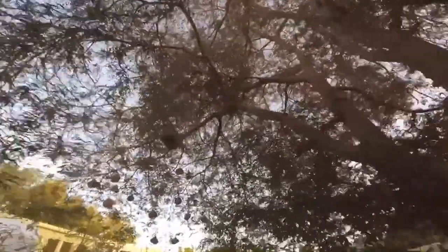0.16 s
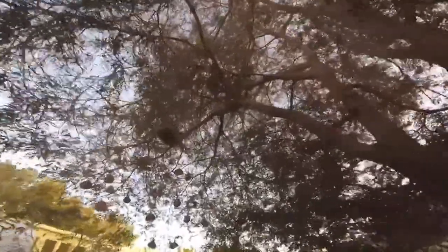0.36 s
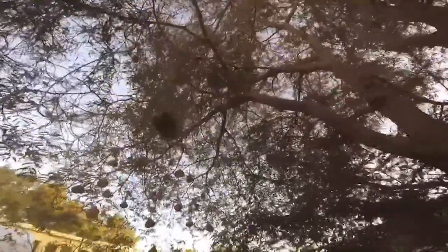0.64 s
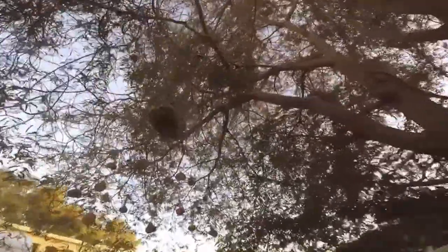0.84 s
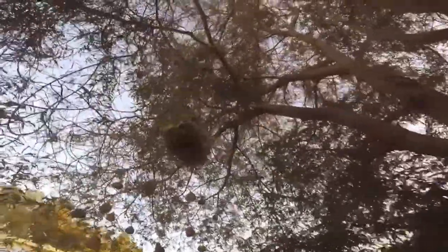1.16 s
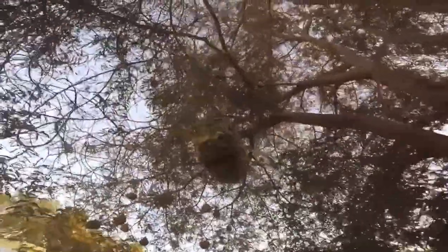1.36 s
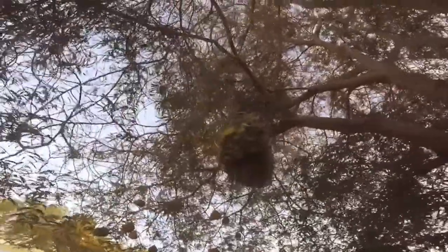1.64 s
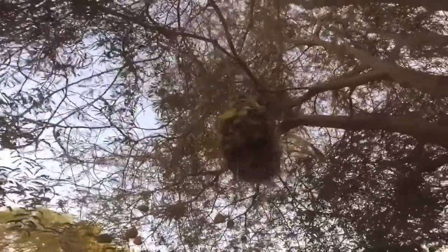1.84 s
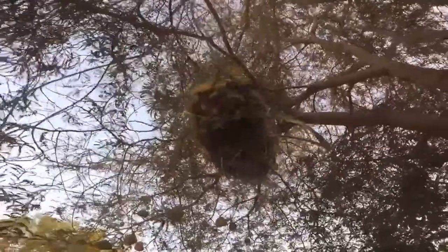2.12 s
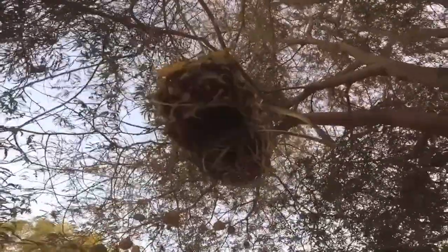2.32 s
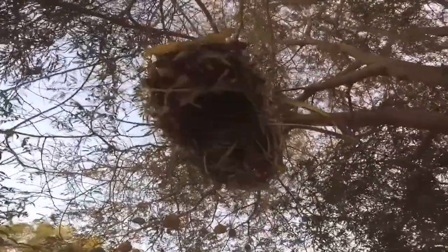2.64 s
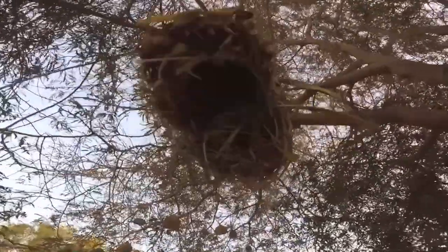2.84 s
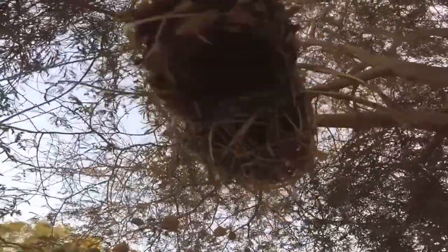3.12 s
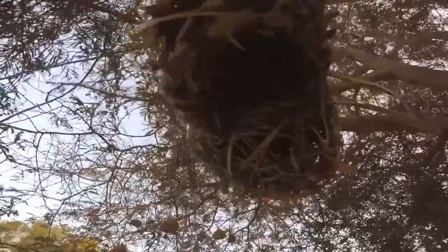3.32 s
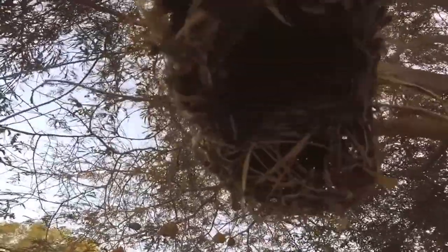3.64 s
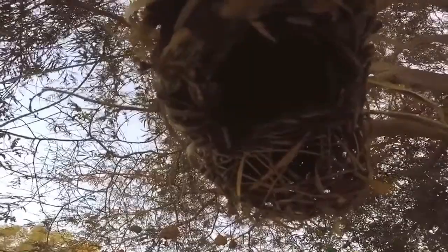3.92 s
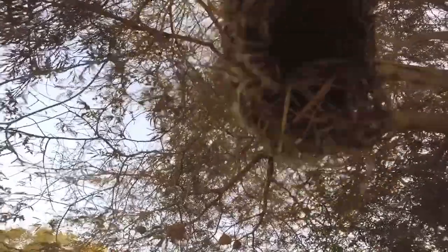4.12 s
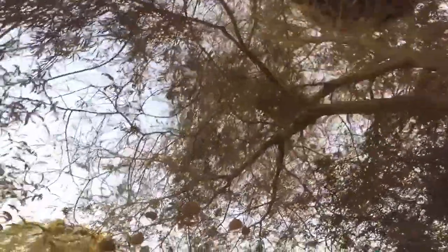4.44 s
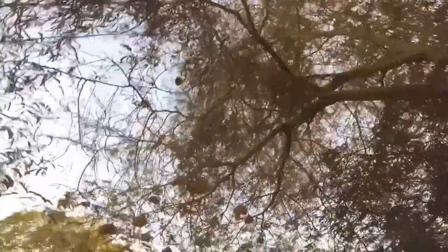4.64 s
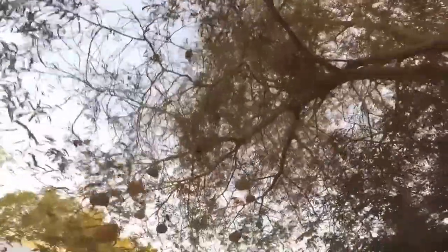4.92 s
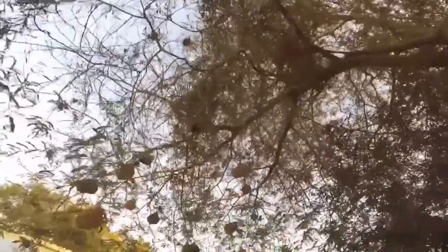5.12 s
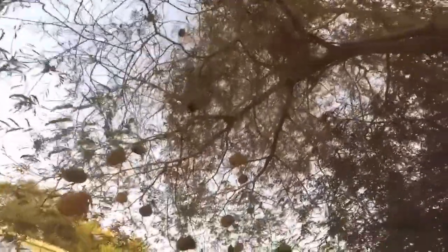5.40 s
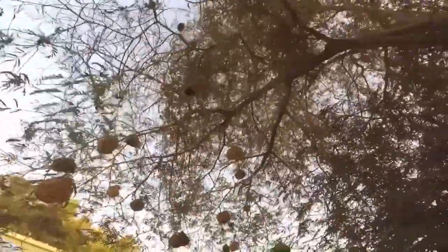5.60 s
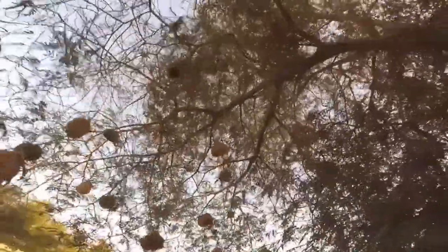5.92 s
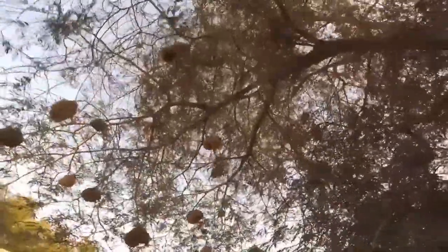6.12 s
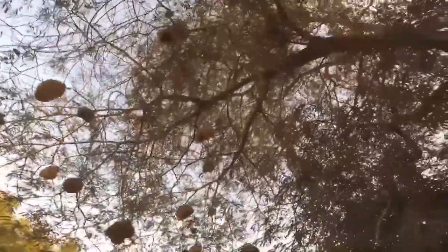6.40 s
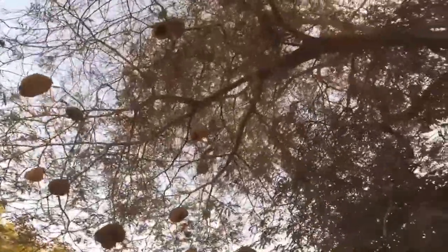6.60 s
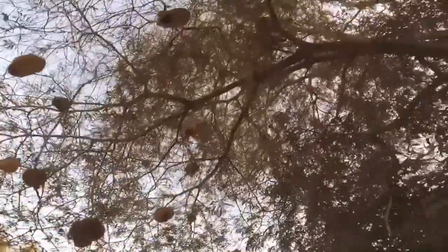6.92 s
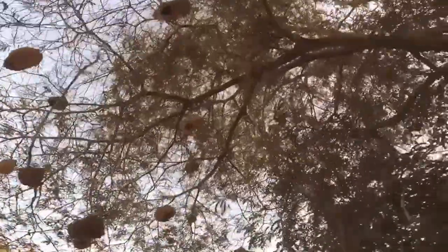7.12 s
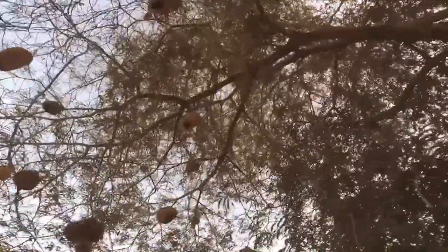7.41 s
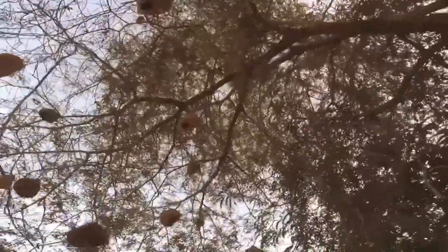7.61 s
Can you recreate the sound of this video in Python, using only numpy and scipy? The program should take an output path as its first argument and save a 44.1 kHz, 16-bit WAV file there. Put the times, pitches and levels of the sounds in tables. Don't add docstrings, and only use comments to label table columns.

```python
import sys
import numpy as np
from scipy import signal
from scipy.fft import rfft, irfft
from scipy.io import wavfile
from scipy.ndimage import uniform_filter1d

SR = 44100
rng = np.random.default_rng(int(sys.argv[2]) if len(sys.argv) > 2 else 0)


def decibels_to_gain(level_db):
    exponent = np.asarray(level_db, float) / 20
    return 10 ** exponent


def dump_mix(stems):
    frames = np.atleast_2d(stems).T
    limited = np.clip(frames, -1, 1)
    pcm = np.round(limited * 32767).astype(np.int16)
    wavfile.write(sys.argv[1], SR, pcm)


N = 342216

# time_s, rumble_db
RUMBLE = [(0, -26), (.5, -27.5), (1.3, -27), (1.9, -31.5), (2.2, -28), (2.6, -33), (2.9, -38),
          (3.15, -44.5), (3.4, -41.5), (3.9, -45), (4.6, -52), (4.9, -55.5), (5.6, -63), (6.5, -65),
          (6.8, -69), (7.76, -76)]


def rms_one(x):
    return x / np.sqrt(np.mean(x ** 2) + 1e-20)


def band(x, low_hz, high_hz, order=2):
    return signal.sosfilt(signal.butter(order, [low_hz, high_hz], "band", fs=SR, output="sos"), x)


def add(out, s, sound, pan_db):
    i = round(s * SR)
    out[:, i:i + len(sound)] += decibels_to_gain(np.array([[pan_db / 2], [-pan_db / 2]])) * sound[:N - i]


def chips(rows, pan_db, flicker_db, land_hz, swell_db, tail_db, breath_db):
    out = np.zeros((2, N))
    for s, hold, start_hz, break_hz, db in rows:
        t = np.arange(-.004, hold + .017, 1 / SR)
        after = np.maximum(t - hold, 0)
        held = np.clip(t / hold, 0, 1)
        step = 5120 < break_hz < 5800

        sag = .5 * held + .5 / (1 + np.exp(-9 * (held - .45)))
        scoop_hz = 1400 * np.exp(-(t + 0.0041) / 0.001886)
        fall_hz = (break_hz - land_hz - 380 * step) * (1 - np.exp(-(after / .0028) ** 1.5))
        slide_hz = np.interp(after, [0, .011, .017], [0, 150 if step else 450, 800])
        hz = start_hz + (break_hz - start_hz) * sag - scoop_hz - fall_hz - slide_hz

        times = [-.004, .002, hold - .005, hold, hold + .004, hold + .009, hold + .013, hold + .017]
        levels = [-22, swell_db, 0, -1.5, tail_db, tail_db - 6.5 + 5 * step, tail_db - 15 + 10 * step, -35]
        level_db = np.interp(t, times, levels)
        level_db += flicker_db * rms_one(band(rng.standard_normal(4000), 80, 400))[-len(t):]

        turn = 2 * np.pi * np.cumsum(hz) / SR
        second = decibels_to_gain(-32.5 + 22 * (after > 0)) * np.sin(2 * turn)
        voice = np.sin(turn) + second + decibels_to_gain(-28) * np.sin(3 * turn)
        breath = decibels_to_gain(breath_db) * band(rng.standard_normal(len(t)), 2800, 16000)
        add(out, s - .004, decibels_to_gain(db + level_db) * (voice + breath), pan_db)
    return out


def rasps(rows, end_hz, pan_db, flutter_hz, swing_hz, throb, breath, throat_db):
    out = np.zeros((2, N))
    for s, length, start_hz, db in rows:
        t = np.arange(0, length, 1 / SR)
        u = t / length
        wander = rms_one(band(rng.standard_normal(4000), 51, 750))[-len(t):]
        turn = 2 * np.pi * np.cumsum(flutter_hz * (1 + .12 * wander)) / SR
        hz = start_hz + (end_hz - start_hz) * u ** 0.52 + swing_hz * np.cos(turn) + 220 * wander
        voice = np.sin(2 * np.pi * np.cumsum(hz) / SR)
        noise = rng.standard_normal(4000)
        airy = (rms_one(band(noise, 3000, 7600)) + decibels_to_gain(1) * band(noise, 1300, 15500))[-len(t):]
        pulse = 1 - throb * (.5 - .5 * np.sin(turn - .3))
        shape = decibels_to_gain(np.interp(u, [0, .15, .6, .8, 1], [-20, -4.5, -0.4, -2, -13]))
        call = shape * (pulse * voice + breath * airy)
        throat = band(call, 5400, 6250, order=1)
        add(out, s, decibels_to_gain(db) * (decibels_to_gain(throat_db) * call + throat), pan_db)
    return out


def near_bird():
    # start_s, hold_s, start_hz, break_hz, peak_db
    near_chips = [(.252, .022, 5750, 5280, -36.5), (.442, 0.021, 5620, 5120, -39.5),
                  (1.073, .023, 5857, 5724, -34.5), (1.145, 0.026, 5620, 4850, -38),
                  (1.186, 0.022, 5580, 5120, -34.5), (1.743, 0.027, 5555, 5150, -37),
                  (2.329, 0.024, 5530, 5270, -34), (2.41, 0.022, 5440, 4890, -34.5),
                  (3.0, 0.026, 5570, 5120, -33), (3.745, 0.024, 5590, 5310, -34),
                  (3.823, .025, 5400, 4870, -34.5), (4.23, 0.024, 5600, 5220, -34),
                  (4.313, .024, 5370, 4900, -35), (4.427, .021, 5570, 5010, -37),
                  (4.877, .022, 5510, 5250, -34.5), (5.651, 0.023, 5520, 5340, -36.5),
                  (5.73, 0.026, 5360, 4820, -37), (6.507, 0.026, 5480, 5154, -34),
                  (6.587, .023, 5280, 4830, -35), (7.168, .022, 5570, 5040, -41)]
    # start_s, length_s, start_hz, peak_db
    near_rasps = [
        (.115, 0.052, 4800, -23.5),
        (1.2, 0.055, 5000, -25.5),
        (3.425, .046, 4900, -22),
        (4.944, .056, 4600, -23),
    ]
    calls = chips(near_chips, pan_db=0, flicker_db=1.34, land_hz=3305, swell_db=-3, tail_db=-7.5, breath_db=-17)
    return calls + rasps(near_rasps, end_hz=5900, pan_db=-1.6, flutter_hz=215, swing_hz=800,
                         throb=.75, breath=.2, throat_db=-8)


def far_bird():
    # start_s, hold_s, start_hz, peak_db
    far_chips = [(0.817, 0.014, 6300, -57), (.893, .02, 6660, -60), (1.612, 0.016, 6630, -54),
                 (2.101, 0.017, 6750, -52), (2.24, 0.024, 5900, -63), (2.837, .013, 7000, -53),
                 (2.927, 0.014, 6250, -58), (3.547, .018, 6800, -49.5), (4, 0.019, 6620, -46.5),
                 (4.574, 0.025, 6980, -45), (4.834, 0.024, 6700, -47), (5.548, 0.024, 7080, -40.5),
                 (5.99, 0.024, 6960, -39), (6.357, 0.024, 6940, -33), (6.802, 0.02, 6940, -31)]
    sag_hz, sag_hz_per_db = 623, 10
    rows = [(s, hold, hz, hz - sag_hz - sag_hz_per_db * (db + 45), db) for s, hold, hz, db in far_chips]
    return chips(rows, pan_db=-0.5, flicker_db=2.6, land_hz=4180, swell_db=-10.5, tail_db=-11.5, breath_db=-26)


def whistles():
    out = np.zeros((2, N))
    # start_s, length_s, start_hz, end_hz, peak_db
    soft_notes = [
        (1.795, 0.0207, 5050, 4900, -44),
        (2.541, 0.034, 2950, 2700, -55.5),
        (3.675, 0.068, 3850, 4340, -57),
        (4.61, .035, 2830, 3070, -54),
        (5.303, 0.083, 2170, 1940, -57),
        (5.478, 0.085, 2100, 2030, -61),
    ]
    for s, length, start_hz, end_hz, db in soft_notes:
        hz = np.linspace(start_hz, end_hz, round(length * SR))
        flicker = rms_one(band(rng.standard_normal(6000), 30, 200))[-len(hz):]
        tone = np.sin(2 * np.pi * np.cumsum(hz + 50 * flicker) / SR)
        add(out, s, decibels_to_gain(db + 4 * flicker) * np.hanning(len(hz)) ** .5 * tone, -.7)
    return out


def hidden_birds():
    # start_s, hold_s, start_hz, break_hz, peak_db
    hidden_chips = [
        (7.311, 0.028, 6770, 6210, -34),
        (7.397, .023, 6450, 6010, -34.5),
    ]
    # start_s, length_s, start_hz, peak_db
    hoarse_rasps = [
        (3.064, 0.048, 3008, -31.5),
        (3.198, 0.06, 5990, -39.5),
        (3.3, 0.036, 5740, -45.5),
    ]
    calls = chips(hidden_chips, pan_db=-0.5, flicker_db=4, land_hz=4260, swell_db=-18, tail_db=-7.5, breath_db=-31)
    hoarse = rasps(hoarse_rasps, end_hz=6450, pan_db=1, flutter_hz=290, swing_hz=1200,
                   throb=.5, breath=.3, throat_db=0)
    return calls + whistles() + band(hoarse, 2600, 7700, order=3)


def chatter(level_db):
    draw = rng.random((160, 4))
    hz = np.where(draw[:, 1] < .4, 3000, 6200) * (.9 + .2 * draw[:, 2])
    rows = [(.01 + 7.6 * d[0], .025, f, .94 * f, level_db + 5 * d[3] - 4 * (f < 4000)) for d, f in zip(draw, hz)]
    return chips(rows, pan_db=0, flicker_db=3, land_hz=3000, swell_db=-3, tail_db=-20, breath_db=-34)


def echo(x, t60, late_t60, late_db, wall_db):
    t = np.arange(SR // 2) / SR
    sparse = rng.random((2, len(t))) < .03 + .5 * t
    decay = decibels_to_gain(-60 * t / t60) + decibels_to_gain(late_db - 60 * t / late_t60)
    response = rng.standard_normal((2, len(t))) * sparse * decay * (t > .003)
    response /= np.sqrt(np.sum(response ** 2, axis=1, keepdims=True))
    response[[0, 1], [860, 866]] += decibels_to_gain(wall_db)
    return signal.fftconvolve(x, response, axes=1)[:, :N]


def knocks():
    # contact_s, peak_db, boom_db, body_db, tick_db
    contacts = [(0.575, -33.5, -0.5, -11, -12), (0.587, -28.5, -2, -14, -8.5), (0.652, -29, 1.5, -15, -5),
                (0.874, -33.5, 7.5, -9, -1.5), (0.887, -33, -7, -25, -8.5), (0.981, -20, -6, -16.5, -15),
                (1.584, -52, 1, -15, -17), (2.021, -18, -8.5, -12.5, -15), (2.125, -21.5, -7, -17, -21.5),
                (2.696, -24.5, -4, -16.5, -9.5), (2.755, -38, 0.5, -26, -11), (2.867, -34, -2.5, -17, -17),
                (2.946, -43.5, -5.5, -4, 0.5), (3.08, -36.5, -7.5, -29, -6.5),
                (3.209, -33.5, -7, -11.5, -12.5), (3.452, -33.5, -16, -16.5, -13),
                (3.634, -36.5, -18, -12, -17), (3.932, -62, -29, -1, -9), (3.961, -30.5, -26, -1, -17.5),
                (5.929, -21, -30, -6, -6)]
    # mode_hz, level_db, t60_s, right_phase_rad
    modes = [(67, 7, 0.11, 0.66), (98.8, 10.5, 0.12, 0.28), (206.8, 2.5, 0.101, 0.61),
             (309.4, 16, 0.054, -2), (349, 11.5, 0.024, 0.5), (556, 4.5, 0.043, -8),
             (718, 8.5, 0.016, -0.9), (2100, -5.5, 0.028, -2)]
    s, db, boom_db, body_db, tick_db = np.transpose(contacts)
    out = np.zeros((2, N))
    spread_db = rng.normal(0, 1.5, (len(s), len(modes)))
    for k, (hz, mode_db, t60, phase) in enumerate(modes):
        clicks = np.zeros(N) + 1e-18
        colour_db = boom_db if hz < 150 else tick_db if hz > 500 else body_db if hz > 250 else 0
        late_s = .0012 if hz < 500 else 0
        clicks[((s + late_s) * SR).astype(int)] = decibels_to_gain(db + mode_db + colour_db + spread_db[:, k])
        r, w = decibels_to_gain(-60 / (t60 * SR)), 2 * np.pi * hz / SR
        for side, start in enumerate([0, phase]):
            resonator = [np.sin(start), r * np.sin(w - start)], [1, -2 * r * np.cos(w), r * r]
            ring = signal.lfilter(*resonator, clicks)
            out[side] += band(ring, 0.66 * hz, 1.78 * hz)
    for at, level_db, noise in zip(s, db + tick_db, rng.standard_normal((len(s), 2, 500))):
        i = round((at + 0.00071) * SR)
        scratch = band((noise + noise[0]) * np.exp(-np.arange(500) / 100), 400, 2300, order=4)
        out[:, i:i + 500] += decibels_to_gain(level_db + 1) * scratch
    return band(out, 30, 2700, order=3)


def ticks():
    out, t = np.zeros((2, N)), np.arange(400) / SR
    # click_s, peak_db
    clicks = [
        (0.0605, -42),
        (4.551, -42),
        (4.812, -53),
        (4.8364, -47),
        (6.255, -49),
        (6.2821, -47),
        (6.329, -45),
    ]
    for s, db in clicks:
        click = band(rng.standard_normal(400) * np.exp(-t / 0.00097), 500, 6600)
        add(out, s, decibels_to_gain(db + 7) * click, -2.5)
    return out


def signal_step():
    out = np.zeros((2, N))
    decay_s = 0.0082
    add(out, 1.7971, -decibels_to_gain(-19.5) * np.exp(-np.arange(2000) / SR / decay_s), -1)
    return out


def rumble():
    deep_db = np.interp(np.arange(N) / SR, *np.transpose(RUMBLE))
    upper_db = -42 + 0.86 * (deep_db + 30.5)
    white = rng.standard_normal((4, N + SR))
    deep = band(white[:2], 19.8, 38.2)[:, SR:]
    evenness = 0.58
    deep = deep / uniform_filter1d(deep ** 2, size=2600) ** (evenness / 2)
    upper = band(white[2:], 40, 88.6, order=3)[:, SR:]
    mid = decibels_to_gain(deep_db) * rms_one(deep[0]) + decibels_to_gain(upper_db) * rms_one(upper[0])
    side = decibels_to_gain(deep_db - 28) * rms_one(deep[1]) + decibels_to_gain(upper_db - 10) * rms_one(upper[1])
    return mid * decibels_to_gain([[-.3], [.3]]) + side * [[1], [-1]]


def drive():
    # time_s, thump_db
    thump_levels = [(0, -43), (1.5, -48.5), (2.8, -40.5), (3.6, -39), (6, -39.5), (7.76, -38.5)]
    # first_thump_s, last_s
    steady_runs = [
        (.0555, 1.72),
        (1.7463, 2.9),
        (2.9252, 7.72),
    ]
    period_s, bass_opens_db = .1024, -49
    out, t = np.zeros((2, N)), np.arange(-.04, .04, 1 / SR)
    full = np.cos(2 * np.pi * 172 * t) * np.exp(-(t / 0.0044) ** 2)
    thin = signal.sosfiltfilt(signal.butter(4, 122, "high", fs=SR, output="sos"), full)
    for s in np.concatenate([np.arange(first, last, period_s) for first, last in steady_runs]):
        wind_db = np.interp(s, *np.transpose(RUMBLE))
        bass = 7.5 * np.clip((wind_db - bass_opens_db) / 20, 0, 1)
        level_db = np.interp(s, *np.transpose(thump_levels)) + rng.normal(0, 1.2)
        add(out, s - .04, decibels_to_gain(level_db) * (thin + bass * (full - thin)), 0)
    return out


def rustle():
    # middle_s, half_length_s, level_db
    gusts = [
        (.1, 0.29, -59),
        (3.796, 0.48, -59),
        (4.75, 0.49, -56),
        (5.313, 0.086, -58.5),
        (5.706, 0.4, -55),
        (6.265, 0.04, -54.5),
    ]
    strength_db = 0.82 * 20 / 20 * np.minimum(rng.exponential(1, (2, N)), 4)
    grains = (rng.random((2, N)) < 900 / SR) * rng.standard_normal((2, N)) * decibels_to_gain(strength_db)
    puffs = sum(decibels_to_gain(db) * np.exp(-((np.arange(N) / SR - s) / half) ** 2) for s, half, db in gusts)
    return puffs * rms_one(band(grains, 1170, 6700))


def coloured(points):
    hz, db = np.transpose(points)
    grid = np.maximum(np.arange(N // 2 + 1) * SR / N, 1)
    return irfft(rfft(rng.standard_normal(N)) * decibels_to_gain(np.interp(np.log(grid), np.log(hz), db)), N)


def air():
    # frequency_hz, density_db_per_hz
    mid_density = [(59, -29), (100, -75), (132, -0.5), (166, 1), (306, -8), (628, -11), (759, -14.5),
                   (2810, -20), (4870, -26), (6140, -24), (8090, -29), (10200, -32), (11600, -36.5),
                   (14000, -43), (15600, -40)]
    # frequency_hz, density_db_per_hz
    side_density = [(59, -62), (100, -40), (137, 2.5), (173, 5), (348, 0), (862, 0.5), (1660, -7.5),
                    (3330, -22), (4200, -24), (6280, -20), (8090, -22), (10400, -27), (11600, -31),
                    (14300, -39), (15600, -83)]
    mid, side = rms_one(coloured(mid_density)), rms_one(coloured(side_density))
    return band(decibels_to_gain(-51.5) * (mid + decibels_to_gain(2.5) * side * [[1], [-1]]), 118, 19000, order=5)


def scene():
    near, far, hidden = near_bird(), far_bird(), decibels_to_gain(-1.5) * hidden_birds()
    colony = chatter(level_db=-63.5)
    birds = near + far + hidden
    to_echo = decibels_to_gain(-5) * near + decibels_to_gain(-5) * far + hidden + decibels_to_gain(1) * colony
    birds += echo(to_echo, t60=0.11, late_t60=0.63, late_db=-19, wall_db=-21)
    birds[1] = np.interp(np.arange(N) - 1.6, np.arange(N), birds[1]) * 1.56
    settle = np.minimum(np.arange(N) / (.004 * SR), 1)
    close_sounds = knocks() + ticks() + signal_step() + settle * rumble() + drive()
    return birds + close_sounds + rustle() + air()


def band_limit(x):
    return signal.sosfilt(signal.butter(12, 15710, fs=SR, output="sos"), x)


def record(dry):
    turn = 2 * np.pi * 3900 * np.arange(N) / SR
    ripple = decibels_to_gain(-12) * np.cos(turn) + decibels_to_gain(-17) * np.cos(2 * turn)
    return band_limit(dry + band(dry, 4830, 9100) * ripple)


dry = scene()
out = record(dry)
dump_mix(out)
```